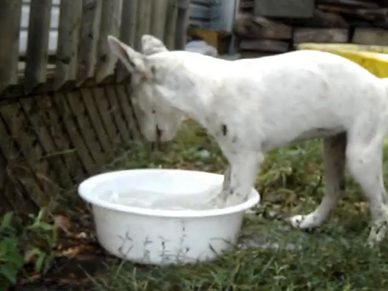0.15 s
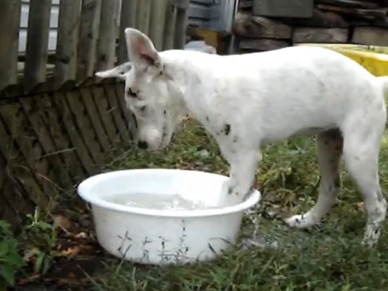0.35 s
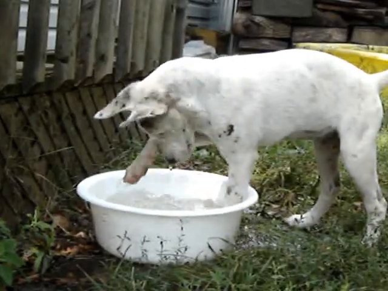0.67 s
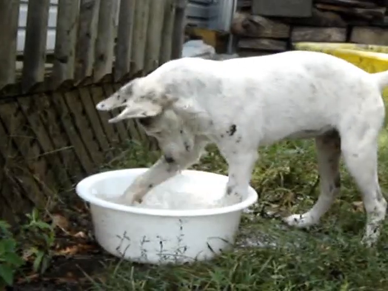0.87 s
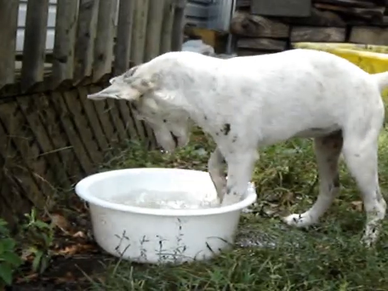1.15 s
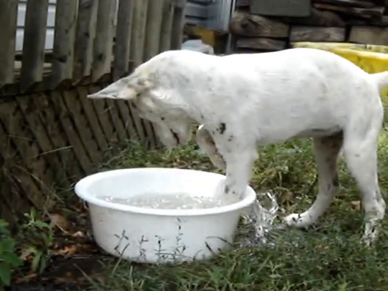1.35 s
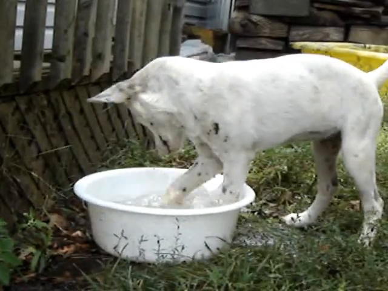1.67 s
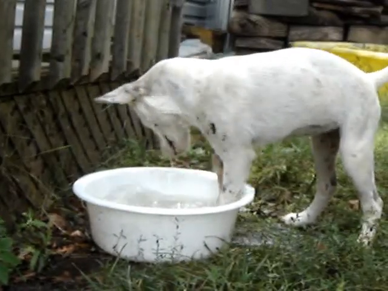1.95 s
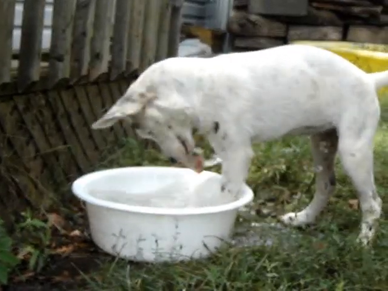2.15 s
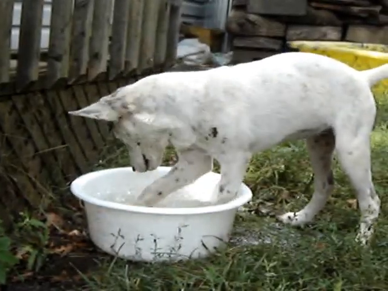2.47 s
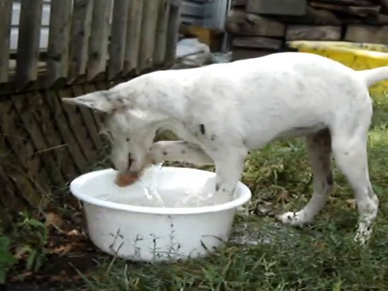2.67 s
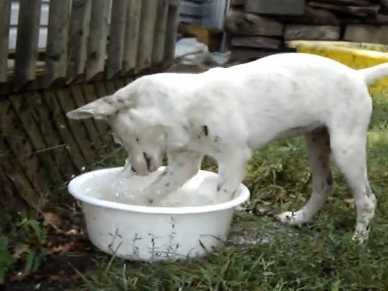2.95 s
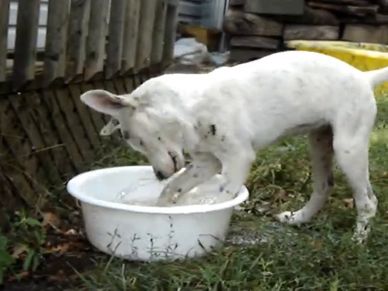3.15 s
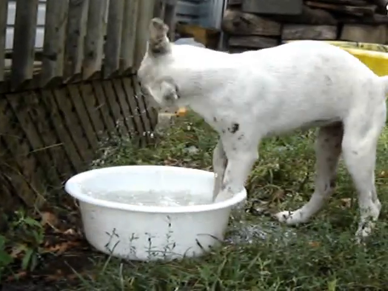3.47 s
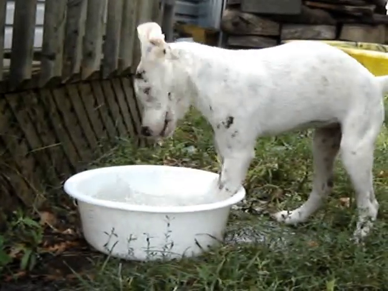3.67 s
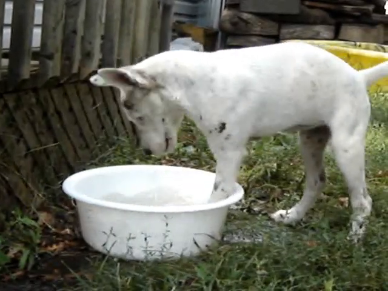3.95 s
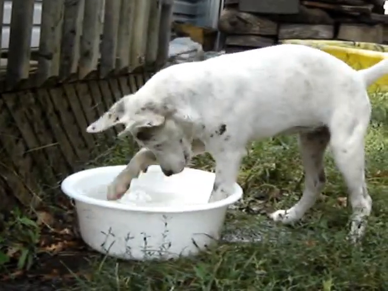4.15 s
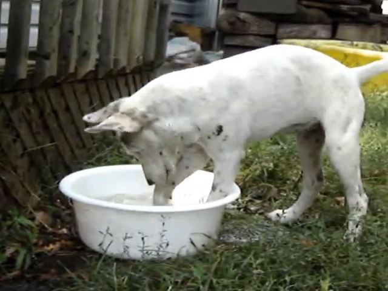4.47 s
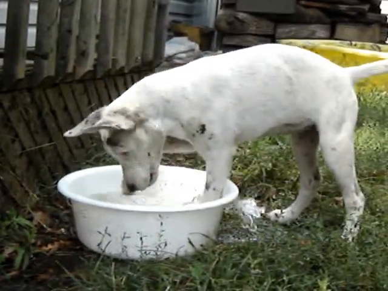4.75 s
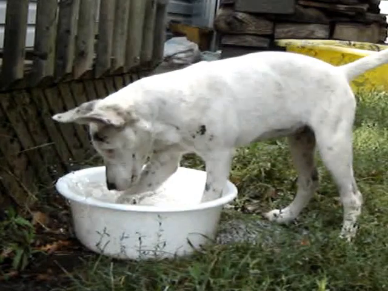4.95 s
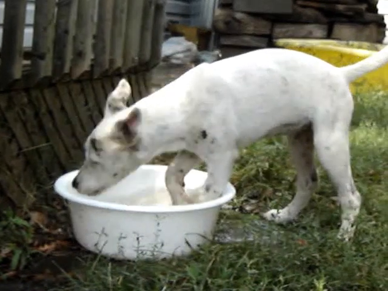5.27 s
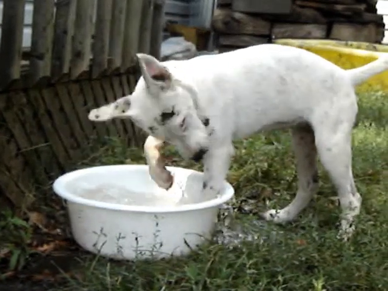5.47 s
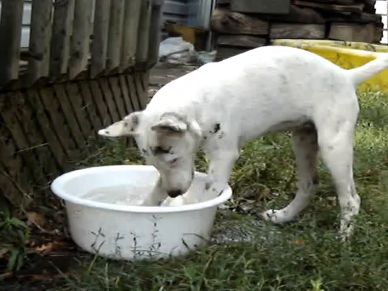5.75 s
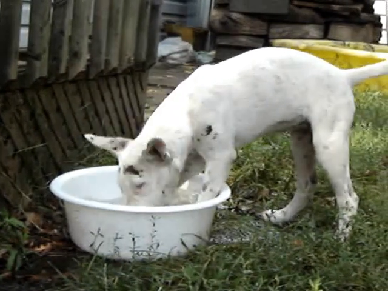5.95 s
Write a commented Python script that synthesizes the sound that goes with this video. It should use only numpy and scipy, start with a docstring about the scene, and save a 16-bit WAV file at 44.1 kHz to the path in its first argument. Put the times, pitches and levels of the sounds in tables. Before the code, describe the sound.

Irregular splashing and gurgling as a small dog's paw stirs a tub of water on grass, with dry drop ticks and distant machinery humming.

```python
"""A lawn beside a wooden fence, where a puppy paws at the water in a plastic tub.
Each stroke stirs up dense runs of bubbles and spray; trapped air plops and gulps as short rising tones,
drops spatter as dry ticks of noise and trickle off the paw as small bubbles of nearly one pitch.
Dull bumps sound as the puppy shifts its weight. Behind lie noise for the garden, wet grass and foam,
a wavering hum of far machinery and a soft distant drone."""
import sys
import numpy as np
from scipy import signal
from scipy.fft import rfft, irfft
from scipy.io import wavfile

SR = 44100
rng = np.random.default_rng(int(sys.argv[2]) if len(sys.argv) > 2 else 0)


def output_pcm(signal):
    """Save a mono or channel-first signal as 16-bit PCM at the path in sys.argv[1].

    Samples are clipped to [-1, 1] before scaling.
    """
    pcm = np.clip(np.atleast_2d(signal).T, -1, 1) * 32767
    wavfile.write(sys.argv[1], SR, np.round(pcm).astype(np.int16))


N = 269892
TIME = np.arange(N) / SR

# The loudest air pockets closing in the tub.
# Each row: time in seconds, ring level in dB, pitch in Hz, decay time in cycles.
AIR_POCKETS = [(0.225, -34, 511, 7.9), (0.2494, -17, 4070, 1.3), (.2925, -28, 2100, 4.5),
               (.3115, -30.5, 1940, 9), (.3935, -31, 1750, 6.6), (.397, -26, 980, 1.8),
               (.412, -27, 5170, 8), (.4135, -31, 1850, 5.3), (.44, -34.5, 1820, 19), (0.473, -26, 1660, 4),
               (.478, -28, 1010, 4.7), (0.557, -33, 1050, 3.7), (.585, -28, 2500, 2.8),
               (0.592, -22, 4400, 3.1), (.939, -15.5, 3720, 5), (0.9375, -25, 410, 0.71),
               (1.098, -30.5, 1930, 15), (1.1815, -31, 1450, 4.6), (1.184, -24, 4060, 4),
               (1.191, -20, 1650, 1.9), (1.2052, -33, 1590, 8), (1.224, -35, 1690, 6),
               (1.2477, -25, 2010, 5.1), (1.2518, -25, 2430, 4), (1.2684, -2.5, 868, 1.2),
               (1.318, -25.5, 800, 1.3), (1.363, -16, 953, 2.9), (1.363, -27, 1460, 3),
               (1.3677, -22, 1600, 1.3), (1.369, -18.5, 2740, 2), (1.375, -33, 1010, 7.7),
               (1.501, -12, 2880, 0.93), (1.525, -20.5, 2650, 7.3), (1.531, -20.5, 2440, 6),
               (1.535, -23, 2620, 3.7), (1.543, -21, 3140, 2.8), (1.6395, -15, 4850, 9),
               (1.644, -16, 4050, 2.8), (1.6532, -15, 2303, 7), (1.6877, -13, 2540, .7),
               (1.6875, -26, 770, 1.4), (1.706, -20, 4770, 1.9), (1.7715, -25.5, 700, 1.9),
               (1.7727, -22.5, 2400, 7.5), (1.785, -26, 960, 1.8), (1.793, -28, 1040, 2.5),
               (1.7813, -18.5, 4600, 3.5), (1.7857, -23, 1920, 2.8), (1.7955, -28, 4800, 3.5),
               (1.807, -16.5, 2300, 2.1), (1.831, -20.5, 3420, 1.6), (1.9732, -32, 483, 9.2),
               (2.008, -27.5, 3150, 8.9), (2.0584, -22.5, 940, 4.5), (2.058, -24, 2400, 1.8),
               (2.41, -27, 4240, 6.5), (2.443, -24, 4160, 9.2), (2.479, -19, 3780, 1.7),
               (2.5535, -21.5, 2270, 2.5), (2.574, -22, 2520, 2.1), (2.639, -25, 3550, 3.5),
               (2.837, -20.5, 1050, 0.76), (2.8372, -11, 2830, 2.9), (2.838, -12.5, 4400, 3.8),
               (2.8484, -19, 2400, 1.3), (2.847, -25, 5030, 3.5), (2.8645, -18.5, 2330, 1.5),
               (2.874, -18, 3020, 1.1), (2.9068, -21, 2430, 6), (2.908, -29, 3120, 6.6),
               (2.92, -29, 2560, 6), (2.932, -27, 2370, 4), (2.959, -31, 2540, 8), (2.974, -32, 2300, 12),
               (3.0367, -7.5, 2560, 3.2), (3.0357, -13.5, 4700, 3.7), (3.0355, -23.5, 684, 2.1),
               (3.055, -33.5, 288, 9), (3.082, -29, 2660, 5.5), (3.267, -29.5, 1590, 3.4),
               (3.3577, -31.5, 1510, 11), (3.376, -24, 2300, 0.73), (3.519, -26.5, 1050, 3.8),
               (3.586, -21, 3040, 3.1), (3.588, -27, 6770, 9), (3.629, -30, 1950, 5.5),
               (3.638, -27, 2460, 4), (3.7154, -25.5, 1860, 3.7), (3.7147, -29, 1040, 2.5),
               (3.745, -30.5, 1180, 5), (4.342, -22.5, 3500, 0.94), (4.388, -31, 2000, 3.3),
               (4.392, -24.5, 1570, 4), (4.4241, -20, 1510, 0.47), (4.446, -18.5, 312, 2.1),
               (4.4474, -26.5, 486, 1.2), (4.4476, -30, 2140, 3.7), (4.6342, -22.5, 2610, 14),
               (4.6333, -26, 3100, 5.6), (4.923, -19.5, 3680, 4.6), (4.9272, -23, 3940, 3.3),
               (4.9565, -22, 2500, 5), (4.9605, -16, 2720, 2.9), (4.9693, -11.5, 3630, 2.1),
               (4.9721, -25, 1030, 2.6), (4.97, -33, 776, 2.6), (4.928, -28, 984, 4),
               (4.9833, -25, 950, 2.3), (4.9845, -26, 1910, 5.2), (5.109, -16.5, 3270, 2.4),
               (5.1085, -28, 1150, 1.4), (5.33, -33, 3900, 4.3), (5.342, -22.5, 4090, 5.8),
               (5.343, -26, 3170, 8.7), (5.459, -28, 1050, 1.5), (5.473, -26, 810, 2), (5.481, -31, 840, 2),
               (5.5446, -17, 5370, 7.8), (5.5463, -13, 4270, 4.6), (5.548, -16.5, 8600, 5.6),
               (5.8016, -21.5, 4080, 3.7), (5.8045, -29, 1480, 2.7), (5.825, -19.5, 1290, 2.6),
               (5.8307, -18.5, 1200, 1.2), (5.847, -21, 4020, 1.8)]
# Water slapped or flung down.
# Each row: start in seconds, length in seconds, rms of the middling bubbles in dB,
# tilt in dB (above zero thin spray, below zero deep water).
WATER_SLAPS = [(0.479, 0.014, -48.5, 22), (.873, 0.0075, -48.5, 13), (0.967, 0.019, -35.5, 2.5),
               (1.328, 0.0076, -33.5, 3), (1.36, 0.029, -36, -1.5), (1.4282, 0.0079, -32.5, 5),
               (1.489, 0.014, -47, 15), (1.4995, 0.0026, -33.5, 11.5), (1.523, 0.016, -42.5, 11),
               (1.635, 0.022, -42.5, 13), (1.6855, 0.008, -47, 3), (2.478, 0.013, -34.5, 3),
               (2.558, 0.024, -38, 1), (2.8367, 0.006, -32.5, 1), (2.8475, 0.0041, -33, 2),
               (2.865, 0.014, -35.5, 7), (3.036, 0.02, -33, 0), (3.411, 0.013, -38.5, 1.5),
               (3.587, 0.0069, -39.5, 7.5), (4.446, 0.022, -41.5, 3.5), (4.566, 0.014, -46, 9.5),
               (4.922, 0.0091, -39, 2.5), (4.953, 0.023, -36.5, 8), (4.9692, 0.01, -29, 2),
               (5.108, 0.0072, -30.5, 1.5), (5.47, 0.023, -38.5, 3), (5.543, 0.0075, -36.5, 12.5),
               (5.812, 0.017, -45.5, 6)]
# Water dragged about by the paw.
# Each row: start in seconds, end in seconds, splash rms in dB, gurgle rms in dB,
# pitch of the middling bubbles in Hz.
PAW_STROKES = [(0.145, 0.36, -49.5, -48, 2330), (0.338, 0.484, -47.5, -46.5, 1770),
               (0.567, 0.624, -50.5, -54, 2630), (1.022, 1.2, -51, -64, 3000),
               (1.171, 1.28, -42, -47, 1680), (1.64, 1.768, -54.5, -42.5, 3670),
               (1.76, 1.844, -40.5, -42.5, 2460), (1.896, 2.19, -47, -45, 2250),
               (2.19, 2.304, -47, -46.5, 2760), (2.404, 2.464, -44.5, -43, 3930),
               (2.538, 2.857, -51.5, -44, 3120), (2.894, 3.01, -48, -47.5, 2600),
               (3.054, 3.115, -48, -47, 2530), (3.25, 3.506, -47.5, -50.5, 2630),
               (3.477, 3.589, -44.5, -42.5, 2950), (3.584, 3.68, -47, -46.5, 2950),
               (3.704, 3.83, -45.5, -46, 2040), (4.337, 4.49, -49.5, -53, 2370),
               (4.787, 4.955, -54, -62, 3000), (4.952, 5.03, -40, -46, 2350),
               (5.321, 5.367, -46.5, -37.5, 2870), (5.424, 5.527, -43.5, -41, 2830),
               (5.737, 5.916, -49.5, -58, 2760)]
# The bubbles of gurgle, splash and spray, one row for each.
# Each row: lowest pitch in Hz, highest pitch in Hz, bubbles a second in a slosh, typical decay in cycles.
BUBBLE_KINDS = [(394, 1237, 900, 1.06), (1188, 5220, 2000, 4.5), (4664, 14050, 4500, 5.3)]
# Air pockets that break the surface while still ringing.
# Each row: start in seconds, length in seconds, peak level in dB, middle pitch in Hz.
BURSTING_POCKETS = [(0.4073, 0.0082, -23.5, 760), (.43, .016, -32, 1000), (.444, 0.021, -28.5, 930),
                    (0.47, .008, -31, 754), (.4845, 0.0076, -24, 2720), (.9375, 0.0015, -8, 3410),
                    (3.0365, 0.019, -21, 300), (3.043, .009, -32, 1110), (3.047, 0.017, -21.5, 426),
                    (3.0375, 0.0057, -21, 477), (3.061, 0.0058, -22, 530), (3.0775, 0.0075, -26, 2150),
                    (4.9693, 0.0085, -15.5, 2195), (4.9695, .009, -21, 1850), (5.4381, .005, -24, 2700),
                    (5.44, 0.0091, -24, 412), (5.468, 0.016, -28.5, 440), (5.479, 0.01, -29, 537),
                    (5.5444, 0.0019, -13, 3890), (5.83, 0.0072, -16.5, 416)]
# Single drops smacking the water and the tub.
# Each row: time in seconds, peak level in dB, centre of the tick in Hz.
LANDING_DROPS = [(0.4885, -18, 6500), (1.501, -12, 8000), (1.5265, -20, 4800), (1.5318, -18, 6000),
                 (1.5353, -18, 5500), (1.5635, -22, 6000), (1.6393, -24, 6000), (1.646, -22, 6000),
                 (1.6555, -22, 5500), (1.6625, -21, 3600), (1.6875, -13.5, 8000), (1.692, -10, 9500),
                 (1.7058, -24, 6040), (1.726, -22, 3000), (1.7815, -20, 5000), (1.7863, -18, 4500),
                 (1.798, -23, 4500), (1.807, -31, 5500), (1.8305, -28, 4500), (2.483, -9, 10000),
                 (2.575, -18, 4800), (2.848, -19, 4600), (2.8656, -22, 4500), (2.8717, -20, 4500),
                 (3.0371, -6, 4500), (3.0435, -15, 7500), (3.051, -23, 6000), (3.134, -20, 8500),
                 (3.321, -23, 3280), (3.405, -26, 3600), (3.421, -24, 5000), (3.511, -31, 4500),
                 (3.542, -27, 4700), (3.587, -22, 4200), (3.607, -23, 6000), (3.803, -22, 6000),
                 (4.972, -17, 4500), (4.984, -30, 4000), (5.107, -19, 4000), (5.114, -20, 9500)]
# Water running off the paw in drops of one size.
# Each row: start in seconds, end in seconds, rms level in dB, pitch in Hz.
PAW_RUNOFF = [(.496, 0.53, -41.5, 2600), (1.523, 1.539, -35, 2590), (2.898, 2.933, -36, 2470),
              (2.955, 3.0, -43, 2470), (3.073, 3.104, -42, 2510), (3.613, 3.643, -44, 2430),
              (5.739, 5.772, -45.5, 2900)]
# Echoes off the tub wall, ground and fence.
# Each row: delay in seconds, level against the direct sound in dB.
NEAR_ECHOES = [(.0011, -47.5), (.0027, -24.5), (.0058, -24.5)]
# Dull low bumps as the puppy shifts its weight.
# Each row: time in seconds, peak level in dB, pitch in Hz.
WEIGHT_SHIFTS = [(0.741, -30, 60), (0.913, -29, 85), (0.939, -32, 111), (.986, -31, 62),
                 (1.032, -24.5, 56.4), (1.087, -23, 82.5), (1.156, -32, 85), (1.388, -33, 50),
                 (5.11, -27.5, 51.3), (5.312, -30, 52.4)]
# Rise and fall of the fine fizz of wet grass and foam.
# Each row: time in seconds, rms level in dB.
FIZZ_LEVELS = [(0, -50), (.8, -51), (1.5, -54), (2.2, -46.5), (2.7, -53), (3.3, -48.5), (4.1, -46.5),
               (4.8, -47.5), (5.6, -48), (6.1, -47)]
# Colour of that fizz.
# Each row: frequency in Hz, relative level in dB.
FIZZ_COLOUR = [(800, -32), (2200, -20), (4000, -20.5), (5200, 9.5), (5800, 16), (6300, 14.5), (6650, 16),
               (7100, 14.5), (8300, 13.5), (9400, 10.5), (10200, -1.5)]
# Colour of the garden air.
# Each row: frequency in Hz, relative level in dB.
GARDEN_COLOUR = [(14, -4), (28, -21.5), (50, 3), (100, 0), (145, -1), (190, 2), (250, -3), (310, -3),
                 (480, -4), (700, -5), (950, -3.5), (1300, -11), (2500, -12), (5000, -14), (8000, -60),
                 (10200, -56)]
# Hum of far machinery.
# Each row: pitch in Hz, rms wander in Hz, levels at the start and at the end in dB rms before sway.
MACHINE_HUMS = [(128.3, 1.14, -46, -49.5), (118.8, 0.39, -62, -52.5), (104.7, 2.5, -58.5, -46)]
# A soft low drone that comes and goes in the distance.
# Each row: time in seconds, rms level in dB.
DRONE_LEVELS = [(0, -57), (1.2, -50.5), (2.3, -46), (3.2, -57), (6.1, -59.5)]


def gain_of(db):
    """Decibels to amplitude."""
    return 10 ** (np.asarray(db) / 20)


def evened(x):
    """Scales to an rms of one."""
    return x / np.sqrt(np.mean(x ** 2) + 1e-20)


def add(mix, s, sound):
    """Mixes a sound in at a time in seconds."""
    part = mix[max(0, round(s * SR)):][:len(sound)]
    part += sound[:len(part)]


def coloured(x, points):
    """Gives a signal the spectrum of (Hz, dB) points, at an rms of one."""
    hz, db = np.transpose(points)
    log_hz = np.log(np.fft.rfftfreq(len(x), 1 / SR) + 1)
    shape_db = np.interp(log_hz, np.log(hz), db)
    return evened(irfft(rfft(x) * gain_of(shape_db), len(x)))


def around(x, centre_hz, octaves):
    """Keeps a soft, bell-shaped band about a centre frequency."""
    hz = np.fft.rfftfreq(len(x), 1 / SR) + 1
    distance = np.log2(hz / centre_hz) / octaves
    return irfft(rfft(x) * np.exp(-.5 * distance ** 2), len(x))


def drift(rate_hz):
    """Random wavering with an rms of one, mostly slower than the rate."""
    hz = np.fft.rfftfreq(N, 1 / SR)
    lowpass = np.exp(-(hz / rate_hz) ** 2) * (hz > 0)
    return evened(irfft(rfft(rng.standard_normal(N)) * lowpass, N))


def bubble(hz, ring_s):
    """A pocket of air swells as it pinches off and dies away, its pitch rising as it nears the surface."""
    t = np.arange(int(8 * ring_s * SR) + 64) / SR
    swell_s = 1 / (4 * hz) + 0.11 * ring_s
    shape = (1 - np.exp(-t / swell_s)) ** 2 * np.exp(-t / ring_s)
    cycles = hz * (t + 2.13 * t * t)  # the pitch climbs by 4.26 times its start in a second
    return shape / shape.max() * np.sin(2 * np.pi * cycles)


def bubble_cloud(low_hz, high_hz, per_s, cycles, spread_db, count=48):
    """Bubbles of many pitches born at random moments; most are faint, a few stand out."""
    born = np.flatnonzero(rng.random(N) < per_s / SR)
    sizes = gain_of(spread_db * np.minimum(rng.exponential(1, N), 3.5))
    kinds = rng.integers(0, count, N)
    pitches = np.geomspace(low_hz, high_hz, count)
    damping = 2 ** rng.uniform(-1, 1, count)  # from half to double
    rings = [bubble(hz, cycles / (k * hz)) for hz, k in zip(pitches, damping)]
    cloud = np.zeros(N)
    for i in born:
        add(cloud, i / SR, sizes[i] * rings[kinds[i]])
    return cloud


def plops(splat_s=0.0011, lead_s=0.00194, size=1024):
    """Water slaps shut with a brief splat, and the air it traps rings."""
    splat_level_db = -25.52  # rms against the ring's level
    splat_hz, splat_octaves = 2950, 0.75
    limit_db = -14.5  # louder pockets close under the surface and splat no harder
    out, t = np.zeros(N), np.arange(size) / SR
    burst = (t / splat_s) ** 3 * np.exp(-t / splat_s)
    hiss = coloured(rng.standard_normal(N), [(100, -13.0), (10000, -2)])
    for s, db, pitch_hz, cycles in AIR_POCKETS:
        add(out, s, gain_of(db) * bubble(pitch_hz, cycles / pitch_hz))
        centre_hz = np.sqrt(splat_hz * pitch_hz)  # the splat half follows the pitch of the ring
        splat = burst * around(hiss[round(s * SR):][:size], centre_hz, splat_octaves)
        splat_db = min(db, limit_db) + splat_level_db
        add(out, s - lead_s, gain_of(splat_db) * evened(splat))  # the slap comes just before the ring
    return out


def splashes(gurgle_hz=950, centre_hz=2750, octaves=0.7, octaves_per_db=0.34, crowding=2.6):
    """A sudden, crowded burst of bubbles of all sizes; the tilt shifts it from gurgle to spray."""
    spray_db, edge_s, fall_db = -2.0, 0.00095, -4  # edge: quick fade at either end; fall: over the length
    out = np.zeros(N)
    clouds = [bubble_cloud(low, high, crowding * per_s, cycles, spread_db=4.5)
              for low, high, per_s, cycles in BUBBLE_KINDS]
    for s, length, db, tilt_db in WATER_SLAPS:
        t = np.arange(0, length, 1 / SR)
        edges = np.clip(np.minimum(t, length - t) / edge_s, 0, 1)
        shape = edges * gain_of(fall_db * t / length)
        gurgle, splash, spray = (cloud[round(s * SR):][:len(t)] for cloud in clouds)
        gurgle = around(gurgle, gurgle_hz, octaves)
        splash = around(splash, centre_hz * 2 ** (octaves_per_db * tilt_db), octaves)
        for part, share_db in ((gurgle, -tilt_db), (splash, 0), (spray, spray_db + tilt_db)):
            add(out, s, gain_of(db + share_db) * evened(part * shape))
    return out


def sloshes(splash_octaves=0.58, surge_db=4.5, surge_hz=110):
    """Each slosh swells and sinks, stirring large, middling and tiny bubbles in quick little surges."""
    spray_db, spray_hz = 1.5, 2400  # spray against splash, when the splash has this pitch
    out = np.zeros(N)
    surges = gain_of(surge_db * drift(surge_hz))
    clouds = [surges * bubble_cloud(*kind, spread_db=6.5) for kind in BUBBLE_KINDS]
    for start, end, db, gurgle_db, splash_hz in PAW_STROKES:
        gurgle, splash, spray = (cloud[round(start * SR):round(end * SR)] for cloud in clouds)
        progress = np.linspace(0, 1, len(gurgle)) ** 0.76  # puts the crest a little before the middle
        swell = np.sqrt(abs(np.sin(np.pi * progress)))
        splash = around(splash, splash_hz, splash_octaves)  # each stroke favours one size of bubble
        fineness = splash_hz / spray_hz  # smaller bubbles come with more spray
        add(out, start, gain_of(gurgle_db) * evened(gurgle * swell))
        add(out, start, gain_of(db) * evened(splash * swell))
        spray_gain = gain_of(db + spray_db) * fineness
        add(out, start, spray_gain * evened(spray * swell ** 2))  # spray flies mostly at the crest
    return out


def gulps(pitch_rise=0.07):
    """A pocket's tone swells, climbs by a share of its pitch and stops short as it bursts."""
    out = np.zeros(N)
    for s, length, db, pitch_hz in BURSTING_POCKETS:
        u = np.linspace(0, 1, round(length * SR))
        turns = np.cumsum(pitch_hz * (1 + pitch_rise * (u - .5))) / SR
        add(out, s, gain_of(db) * np.sin(np.pi * u) * np.sin(2 * np.pi * turns))
    return out


def spatter(fade_s=0.00061, octaves=1.0, size=256):
    """Each drop lands with one dry, broad tick."""
    out, t = np.zeros(N), np.arange(size) / SR
    for s, db, centre_hz in LANDING_DROPS:
        tick = around(rng.standard_normal(size), centre_hz, octaves) * np.exp(-t / fade_s)
        add(out, s, gain_of(db) * tick / abs(tick).max())
    return out


def trickles(per_s=500, cycles=7.6, scatter_octaves=0.13, spread_db=1.5):
    """A close run of small bubbles of nearly one pitch, fading as the water runs out."""
    out = np.zeros(N)
    for start, end, db, pitch_hz in PAW_RUNOFF:
        run = np.zeros(round((end - start) * SR))
        births = np.arange(0, end - start, 1 / per_s)
        for s, (delay, detune, size) in zip(births, rng.standard_normal((len(births), 3))):
            hz = pitch_hz * 2 ** (scatter_octaves * detune)
            add(run, s + delay / per_s, gain_of(spread_db * size) * bubble(hz, cycles / hz))
        fade = np.sqrt(np.linspace(1, 0, len(run)))
        add(out, start, gain_of(db) * evened(run * fade))
    return out


def surroundings(x, tail_db=-19, t60=1.0, size=12000):
    """A few close echoes and a faint, short scatter from the fence."""
    t = np.arange(size) / SR
    scatter = rng.standard_normal(size) * gain_of(-60 * t / t60) * (t > .005)
    response = gain_of(tail_db) * scatter / np.linalg.norm(scatter)
    response[0] = 1  # the direct sound
    for delay_s, db in NEAR_ECHOES:
        add(response, delay_s, gain_of([db]))
    return signal.oaconvolve(x, response)[:N]


def bumps(ring_s=0.0073):
    """A few heavy, quickly damped swings of the filled tub."""
    out = np.zeros(N)
    for s, db, hz in WEIGHT_SHIFTS:
        add(out, s, gain_of(db) * bubble(hz, ring_s))
    return out


def fizz(per_s=7000, ripple_db=-52, flutter_db=0.9, flutter_hz=25):
    """Countless tiny bursts in foam and wet grass, and the lapping of the unsettled water."""
    ticks = rng.standard_normal(N) * (rng.random(N) < per_s / SR)
    level_db = np.interp(TIME, *np.transpose(FIZZ_LEVELS)) + flutter_db * drift(flutter_hz)
    ripples = evened(bubble_cloud(low_hz=507, high_hz=4690, per_s=140, cycles=12, spread_db=8))
    return coloured(ticks, FIZZ_COLOUR) * gain_of(level_db) + gain_of(ripple_db) * ripples


def garden(air_db=-39):
    """Steady outdoor hiss, made of coloured noise."""
    return coloured(rng.standard_normal(N), GARDEN_COLOUR) * gain_of(air_db)


def machinery(sway=0.39):
    """Far hums: sine tones that waver in pitch and sway in level."""
    out = np.zeros(N)
    for hz, wander_hz, first_db, last_db in MACHINE_HUMS:
        turns = np.cumsum(hz + wander_hz * drift(3.1)) / SR
        level = gain_of(np.linspace(first_db, last_db, N)) * (1 + sway * drift(5.2))
        out += level * np.sqrt(2) * np.sin(2 * np.pi * turns)
    return out


def drone(centre_hz=250, octaves=0.39):
    """A dull, far band of noise."""
    band = evened(around(rng.standard_normal(N), centre_hz, octaves))
    return band * gain_of(np.interp(TIME, *np.transpose(DRONE_LEVELS)))


def scene():
    """Water in the tub, with its echoes, over the garden background."""
    water = plops() + splashes() + sloshes() + gulps() + spatter() + trickles()
    background = fizz() + garden() + machinery() + drone()
    return (surroundings(water) + bumps() + background)[None]


def record(dry, low_cut_hz=30, edge_hz=10280):
    """The small microphone drops the deepest bass and, steeply, the treble above the edge."""
    low_cut = signal.butter(2, low_cut_hz, "high", fs=SR, output="sos")
    thinned = signal.sosfilt(low_cut, dry)
    treble_cut = signal.firwin(901, edge_hz, window=("kaiser", 8), fs=SR)
    return signal.oaconvolve(thinned, treble_cut[None], "same")


dry = scene()
out = record(dry)
output_pcm(out)
```